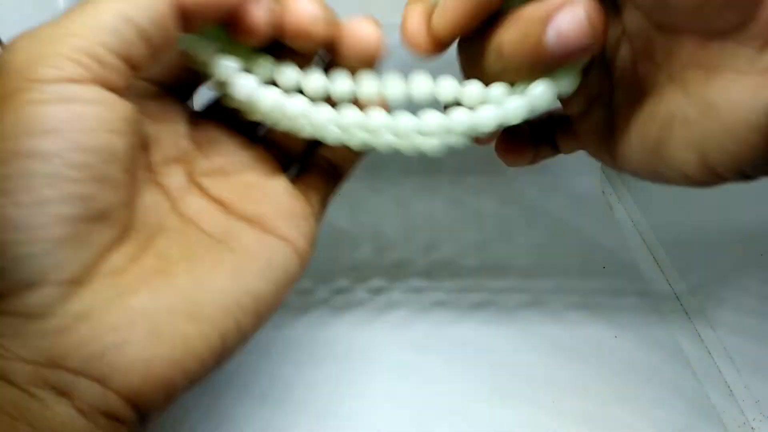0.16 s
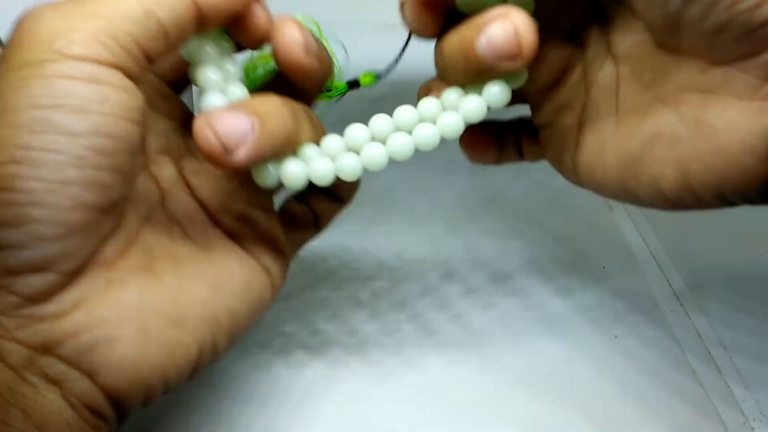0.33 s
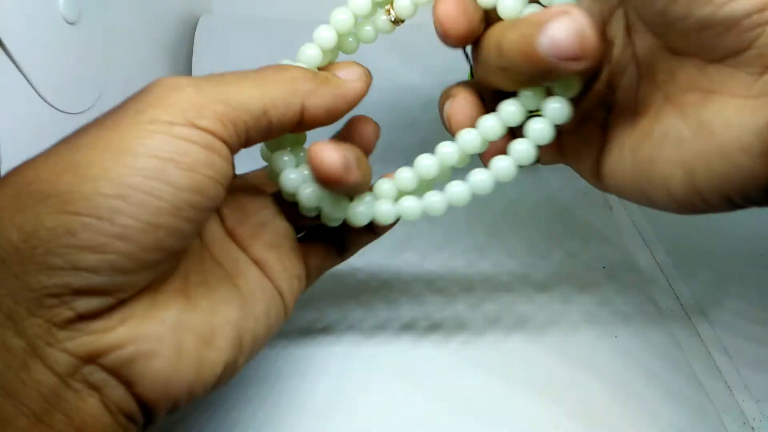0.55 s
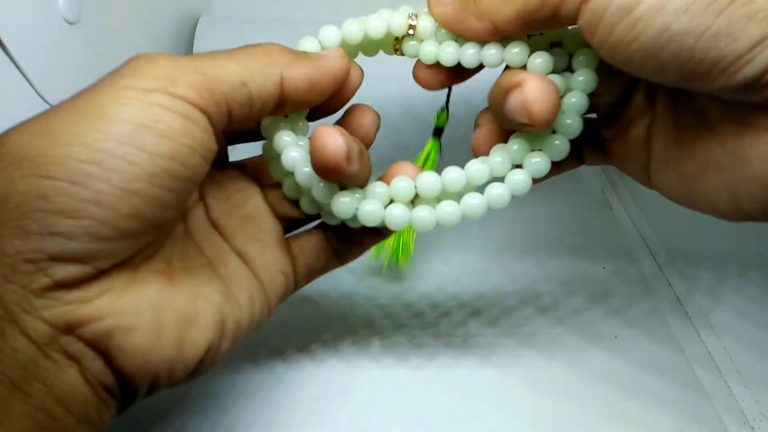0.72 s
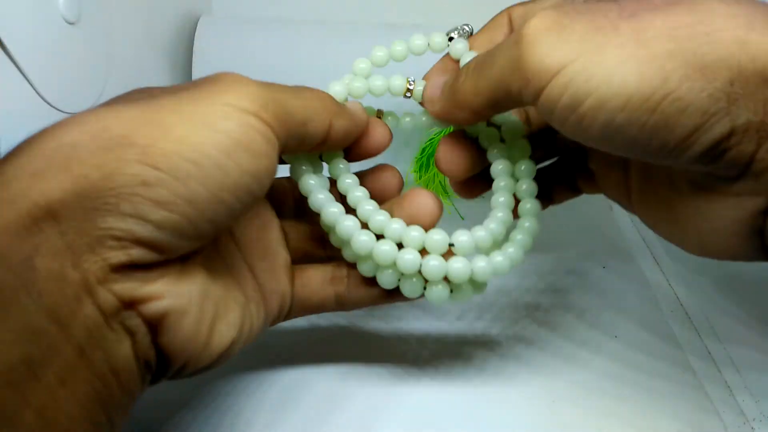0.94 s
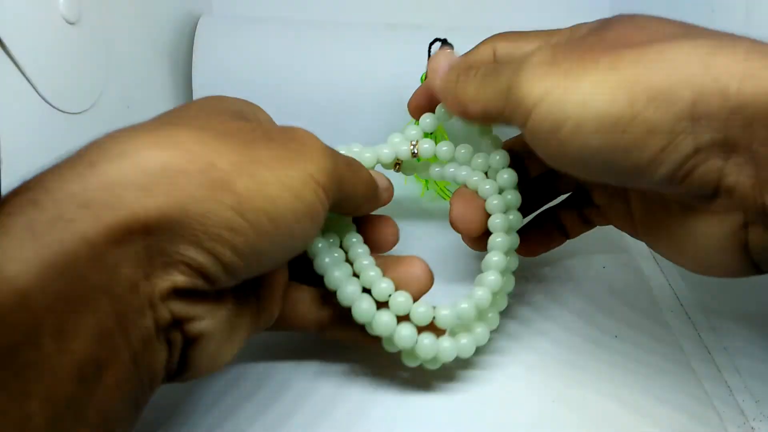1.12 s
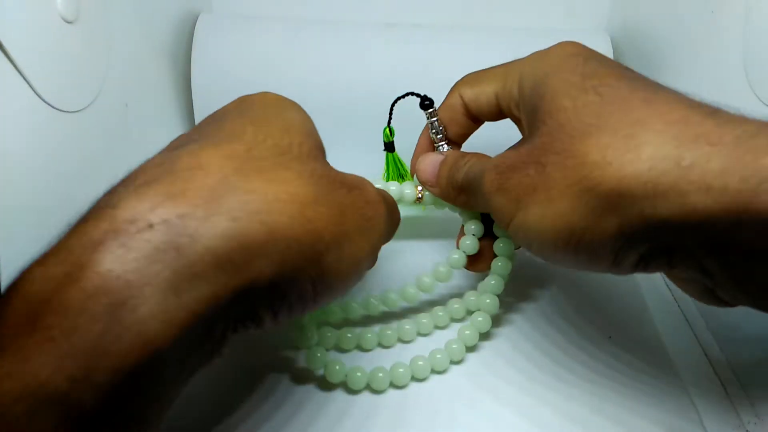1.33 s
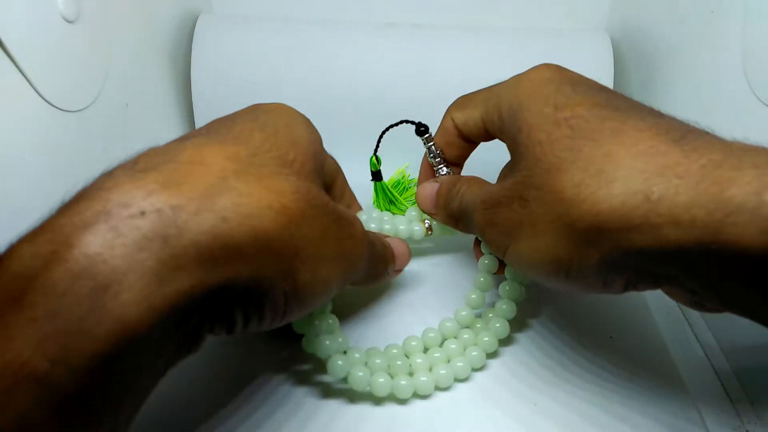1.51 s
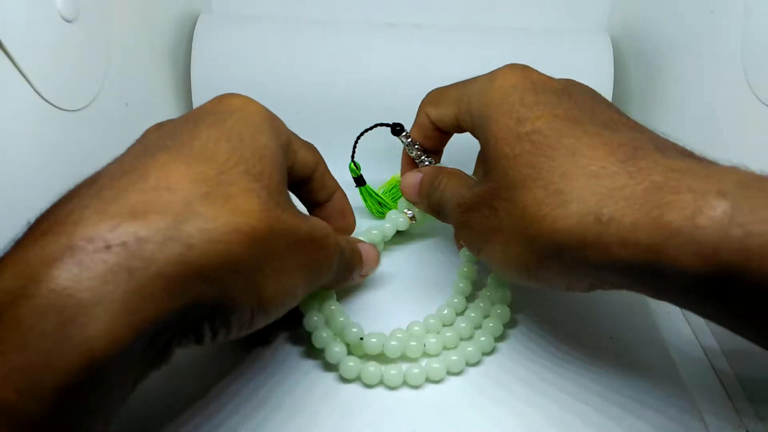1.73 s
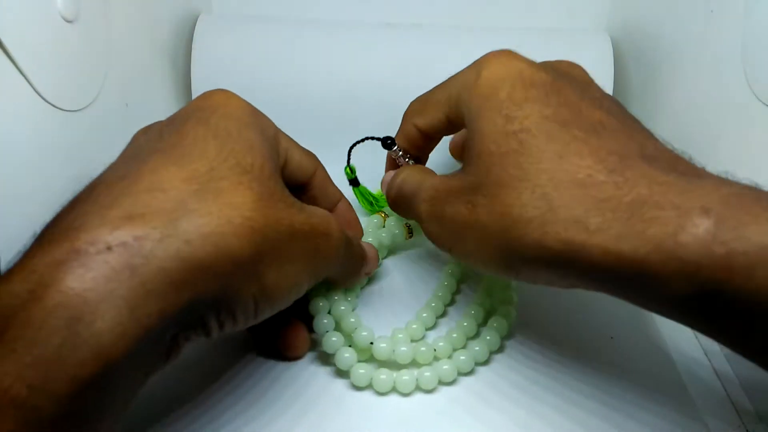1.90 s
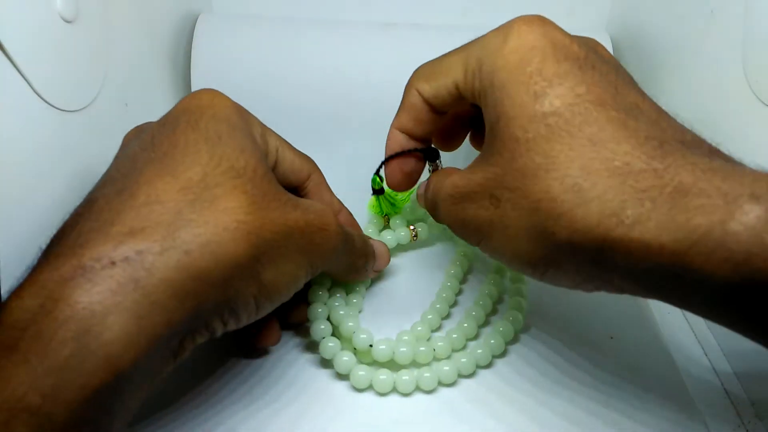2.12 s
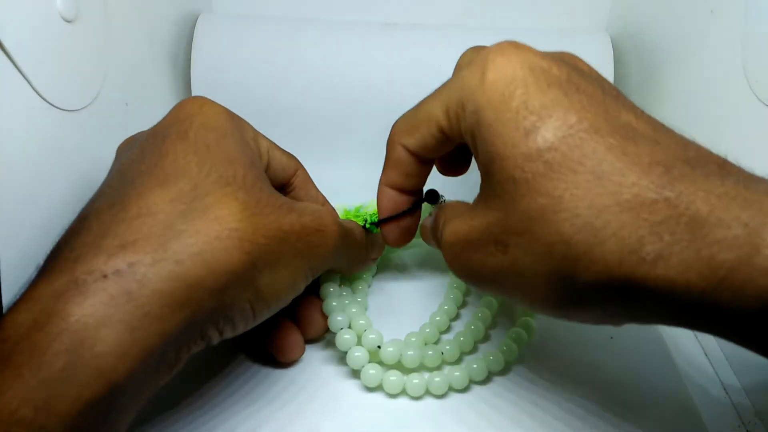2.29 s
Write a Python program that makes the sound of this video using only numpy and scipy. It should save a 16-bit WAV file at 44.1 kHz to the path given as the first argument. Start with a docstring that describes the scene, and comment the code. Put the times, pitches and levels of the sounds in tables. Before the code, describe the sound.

A string of small hard beads clicks and rattles in hands, then lands with dull thumps

```python
"""In a small quiet room, hands turn a string of small hard beads close to a phone, then lay it on
a light hollow table. Each knock runs along the string as a flurry of decaying noise cracks with
pings, over a finer rattle of random clicks. Noise forces on resonant modes make the table's dull
thumps and slide; short resonances make the taps, and low sines and rumble make its sway."""
import sys
import numpy as np
from scipy import signal
from scipy.fft import rfft, irfft
from scipy.io import wavfile
from scipy.ndimage import uniform_filter1d

SR = 44100
rng = np.random.default_rng(int(sys.argv[2]) if len(sys.argv) > 2 else 0)


def to_wav(s):
    """Save 16-bit WAV."""
    ch = np.atleast_2d(s).T  # columns
    pcm = np.round(np.clip(ch, -1, 1) * 32767)  # PCM
    wavfile.write(sys.argv[1], SR, pcm.astype(np.int16))


N = 103635


def undb(db):
    """Logarithmic level: dB to amplitude gain."""
    return 10 ** (np.asarray(db) / 20)


def unit(x):
    """Normalisation: scale to rms 1."""
    return x / np.sqrt(np.mean(x ** 2))


def peak(x, db):
    """Normalisation: scale to a given peak level in dB."""
    return x * undb(db) / np.max(np.abs(x))


def curve(table, order=1):
    """Linear interpolation: one column of a time table at every sample."""
    points = np.array(table)
    return np.interp(np.arange(N) / SR, points[:, 0], points[:, order])


def burst(start, length):
    """Transient envelope: a swell with quick rise and slower fall, cresting near 0.56."""
    u = np.clip((np.arange(N) / SR - start) / max(length, 1e-3), 0, 1)
    return 1.53 * np.sqrt(u) * (1 - u) ** 1.14


def ring(force, hz, t60):
    """Damped resonance: a two-pole mode driven by a force."""
    radius = np.exp(-np.log(1000) / (max(t60, 5e-4) * SR))
    angle = 2 * np.pi * hz / SR
    return signal.lfilter([np.sin(angle)], [1, -2 * radius * np.cos(angle), radius * radius], force)


def shade(x, points):
    """Spectral weighting: filter x by gains interpolated on a logarithmic frequency axis."""
    colour = np.array(points)
    hz = np.arange(N // 2 + 1) * SR / N + 1
    gain_db = np.interp(np.log(hz), np.log(colour[:, 0]), colour[:, 1])
    return irfft(rfft(x) * undb(gain_db), N)


def spikes(times, sizes):
    """Impulsive force: single-sample impacts of given sizes at given times."""
    return np.bincount(np.clip((times * SR).astype(int), 0, N - 1), sizes, N)


def patter(per_s, scatter_db):
    """Poisson process: random impact times, with sizes that are equal at zero scatter."""
    draws = rng.random((2500, 2))
    times = np.cumsum(-np.log(draws[:, 0] + 1e-9)) / per_s
    keep = times < N / SR
    # with scatter, most impacts are small and a few large
    return times[keep], undb(-scatter_db * np.log(draws[keep, 1] + 0.03))


# relative colour of the room noise: (frequency [Hz], gain [dB])
ROOM_COLOUR = [(25, -7), (55, -5.5), (110, -10.5), (220, -15.5), (310, -5), (450, -13), (700, -10),
               (960, -3.5), (1120, -14.5), (1500, -13), (2400, -23), (4000, -30.5), (15000, -38)]
ROOM_DB = -70.5
MURMUR_HZ, MURMUR_DB, MURMUR_S = 852, -77, 0.06


def room():
    """Stationary coloured noise, plus narrow-band noise that slow random modulation makes come and go."""
    sway = unit(uniform_filter1d(rng.standard_normal(N), int(MURMUR_S * SR)))
    murmur = ring(rng.standard_normal(N), MURMUR_HZ, 0.0049)
    murmur = unit(ring(murmur, MURMUR_HZ, 0.0049)) * sway
    hush = unit(shade(rng.standard_normal(N), ROOM_COLOUR))
    return hush * undb(ROOM_DB) + murmur * undb(MURMUR_DB)


# relative colour of a bead click: (frequency [Hz], gain [dB])
BEAD_COLOUR = [(1060, -54.5), (1800, -32.5), (2710, -28.5), (4320, -25.5), (5100, -22), (6610, -14.5),
               (7530, -12), (9030, -1.5), (10100, -4.5), (11300, -10), (14300, -12.5)]
CLICK_T60_S, CLICK_RISE_S = .002, .0002
ECHO_DB, ECHO_T60_S = -17, .04
PING_HZ, PING_SPREAD, PING_SHARE, PING_T60_S = 9910, 0.15, 0.43, .004
THIN, THIN_SPREAD = .85, .35  # share of the previous sample subtracted


def clicks(times, sizes, size=800):
    """Hard impact: a decaying noise crack, a ping of its own pitch, faint reflections; middle and side."""
    t = np.arange(size) / SR
    rise = 1 - np.exp(-t / CLICK_RISE_S)
    head = rise * undb(-60 * t / CLICK_T60_S)
    tail = rise * undb(ECHO_DB - 60 * t / ECHO_T60_S)
    ping_decay = rise * undb(-60 * t / PING_T60_S)
    at = np.clip((times[:, None] * SR).astype(int) + np.arange(size), 0, N - 1).ravel()
    out = []
    for _ in range(2):
        noise = rng.standard_normal((2500, size))[:len(times)]
        ping_hz = PING_HZ * (1 + PING_SPREAD * noise[:, :1])
        ping = PING_SHARE * np.sin(2 * np.pi * ping_hz * t)
        crack = noise * head + ping * ping_decay
        # body varies randomly from click to click
        thin = np.clip(THIN + THIN_SPREAD * noise[:, 1:2], 0, 1)
        grain = crack - thin * np.roll(crack, 1, axis=1) + noise * tail
        energy = np.sum(grain ** 2, axis=1)
        grain = grain * (sizes / np.sqrt(energy))[:, None]
        out.append(shade(np.bincount(at, grain.ravel(), N), BEAD_COLOUR))
    return np.array(out)


# fine rattle while the fingers move: (time [s], level [dB])
# the level scales clicks whose whole-scene rms, middle and side together, is 1
RATTLE_LEVEL = [(0, -37.5), (.04, -56), (.1, -57.5), (.175, -75), (.2, -57), (.29, -39), (.33, -41),
                (.36, -55.5), (.395, -56.5), (.42, -55), (.51, -53.5), (.565, -77.5), (.65, -57.5),
                (.7, -50), (.73, -52.5), (.82, -65), (.86, -44), (.92, -50.5), (.945, -62.5), (1.0, -49.5),
                (1.06, -52.5), (1.1, -71.5), (1.19, -49), (1.285, -74), (1.31, -42), (1.4, -52),
                (1.47, -51), (1.57, -54), (1.63, -55.5), (1.7, -39.5), (1.75, -56), (1.82, -60.5),
                (1.88, -45.5), (1.95, -50), (2.0, -79.5), (2.075, -73.5), (2.1, -56), (2.155, -74),
                (2.19, -67), (2.22, -88), (2.35, -92.5)]
RATTLE_PER_S, RATTLE_SCATTER_DB = 610, 0


def rattle():
    """Random superposition: dense clicks of equal energy before colouring, under a moving level."""
    times, sizes = patter(RATTLE_PER_S, RATTLE_SCATTER_DB)
    return unit(clicks(times, sizes)) * undb(curve(RATTLE_LEVEL))


# knocks of bead on bead: (time [s], level before KNOCK_DB and click colour [dB])
KNOCK_EVENTS = [(0.0492, -33), (0.0684, -34.5), (0.087, -30.5), (0.124, -40.5), (0.168, -45.5),
                (0.1889, -35), (0.1923, -33), (0.2043, -25.5), (0.2232, -24), (0.2437, -25.5),
                (0.2587, -32), (0.261, -21.5), (0.2642, -22), (0.2663, -14.5), (0.287, -28.5),
                (0.3019, -24.5), (0.3104, -20), (0.3184, -31), (0.4018, -28.5), (0.411, -35),
                (0.437, -29.5), (0.465, -36.5), (0.484, -39), (0.5016, -33.5), (0.531, -44), (0.6044, -42),
                (0.644, -42.5), (0.6824, -31.5), (0.6934, -32), (0.7355, -33), (0.7692, -31.5),
                (0.7955, -39), (0.8297, -31), (0.8921, -34), (0.952, -32), (0.963, -45), (0.9674, -33.5),
                (0.9798, -33), (0.986, -32), (0.993, -42), (1.0017, -26.5), (1.0155, -35.5),
                (1.1247, -36.5), (1.151, -34), (1.1655, -31), (1.1863, -31), (1.2163, -33), (1.2415, -42.5),
                (1.2637, -41.5), (1.296, -34.5), (1.3065, -26.5), (1.3249, -25.5), (1.333, -31),
                (1.3385, -32), (1.371, -38.5), (1.4229, -35.5), (1.462, -24.5), (1.4993, -25),
                (1.5423, -27.5), (1.5554, -25.5), (1.5658, -33), (1.584, -27.5), (1.6635, -29.5),
                (1.6688, -28.5), (1.6867, -29), (1.6997, -16.5), (1.857, -36), (1.86, -19), (1.909, -37.5),
                (2.0884, -35), (2.1673, -48.5), (2.186, -47), (2.3429, -65.5)]
KNOCK_DB, FLURRY_S = 23.5, 0.0027  # gain of the bare click; time scale of the followers
FOLLOW_DB, FOLLOW_SCATTER_DB = -13, 3


def knocks(count=6):
    """Impact chain: a main click, then mostly weaker ones from its neighbours on the string."""
    t, db = np.array(KNOCK_EVENTS).T[:, :, None]
    draws = rng.standard_normal((len(KNOCK_EVENTS), count, 2))
    follows = np.arange(count) > 0
    late = (np.abs(draws[..., 0]) + 0.3) * follows
    follow_db = FOLLOW_DB + FOLLOW_SCATTER_DB * draws[..., 1]
    level_db = db + KNOCK_DB + follows * follow_db
    times = t - 2 * CLICK_RISE_S + late * FLURRY_S  # starts early to allow for the rise
    return clicks(times.ravel(), undb(level_db).ravel())


# low bumps of hands and table:
# (time [s], level before the swell and bass cut [dB], pitch [Hz], length [s])
BUMP_EVENTS = [(0.087, -60.5, 86.7, 0.12), (0.525, -57.5, 59.4, 0.078), (0.583, -63.5, 63, 0.11),
               (1.331, -57.5, 58.4, 0.036), (1.68, -56, 60, 0.084), (1.755, -49, 64.2, 0.14),
               (1.84, -61, 62.6, 0.15), (1.937, -62, 71.4, 0.16), (1.95, -44.5, 136, 0.039),
               (2.02, -53.5, 66, 0.059), (2.065, -52, 58, 0.1), (2.142, -54.5, 58.4, 0.097)]
BUMP_ROUGH = .8  # rms of the rumble beside a sway of rms 1


def bumps():
    """Low-frequency oscillation: each bump is a few cycles of a sway, shaken by resonant rumble."""
    t = np.arange(N) / SR
    rumble = ring(ring(rng.standard_normal(N), 56, 0.03), 82, 0.01)
    rumble = BUMP_ROUGH * unit(rumble)
    total = np.zeros(N)
    for at, db, hz, length in BUMP_EVENTS:
        sway = np.sqrt(2) * np.sin(2 * np.pi * hz * (t - at))
        total += undb(db) * burst(at, length) * (sway + rumble)
    return total


# modes of the table: (frequency [Hz], share before hardness [dB], main resonator t60 [s])
TABLE_MODES = [(143, -5.5, 0.11), (290, 3.5, 0.082), (440, 4.5, 0.097), (751, -10.5, 0.064),
               (909.5, -8.5, 0.07), (1401, -4, 0.023), (1820, -12.5, 0.045), (2412, -16, 0.011),
               (2880, -16, 0.0027), (4150, -18, 0.00079)]


def table(force, hardness_db):
    """Modal superposition: modes at set shares; hardness tilts them per octave above 300 Hz."""
    total = np.zeros(N)
    for hz, db, t60 in TABLE_MODES:
        mode = unit(ring(ring(force, hz, t60 / 4), hz, t60))
        tilt_db = hardness_db * max(np.log2(hz / 300), 0)
        total += undb(db + tilt_db) * mode
    return total


# beads sliding on the table: (time [s], level applied to unit-rms scraping [dB])
SLIDE_LEVEL = [(1.28, -72), (1.35, -50), (1.42, -65.5), (1.55, -60), (1.63, -67.5), (1.75, -63),
               (1.87, -58.5), (1.935, -63.5), (1.947, -65), (2.0, -72.5), (2.2, -87.5)]
SLIDE_PER_S, SLIDE_SCATTER_DB = 1000, 1.5
SLIDE_HARDNESS_DB = 6.5  # per octave


def slide():
    """Friction as random micro-impacts: small scrapes excite the table modes."""
    times, sizes = patter(SLIDE_PER_S, SLIDE_SCATTER_DB)
    start = SLIDE_LEVEL[0][0]
    gate = curve([(start, 0), (start + .03, 1)])
    scrape = unit(table(spikes(times, sizes), SLIDE_HARDNESS_DB))
    return scrape * undb(curve(SLIDE_LEVEL)) * gate


# loops of the string landing on the table:
# (time [s], peak level [dB], length [s], hardness [dB per octave])
THUMP_EVENTS = [(1.297, -42.5, 0.039, 1), (1.317, -47, .035, 10.5), (1.452, -40.5, 0.019, -0.5),
                (1.49, -37, 0.016, -3.5), (1.672, -47.5, 0.017, 2.5), (1.69, -30.5, 0.015, 3.5),
                (1.698, -44.5, 0.064, 1), (1.951, -36.5, 0.019, 1.5)]
PALM_S, PALM_SHARE = 0.0024, 0.43  # length and share of the soft push


def thumps():
    """Forced modal response: a brief soft push and the rough landing of many beads shake the table."""
    total = np.zeros(N)
    for t, db, length, hardness_db in THUMP_EVENTS:
        rough = uniform_filter1d(rng.standard_normal(N), size=5)
        force = rough * burst(t, length) + PALM_SHARE * burst(t, PALM_S)
        total += peak(table(force, hardness_db), db)
    return total


# single beads tapping the table: (time [s], peak level [dB], pitch [Hz], length of force [s])
TAP_EVENTS = [(1.334, -44, 1340, .012), (1.352, -38, 1400, 0.012), (1.496, -53, 2420, 0.0077),
              (1.501, -46.5, 3750, 0.0073), (1.542, -49, 1540, 0.0056), (1.543, -38, 2080, 0.0036),
              (1.783, -39.5, 1470, 0.0057), (1.788, -49.5, 1730, 0.038), (1.893, -51, 2414, 0.034),
              (1.897, -51.5, 1390, 0.03), (1.919, -41, 2145, 0.03)]
TAP_T60_S = .011


def taps():
    """Noise-driven resonance: each tap rings roughly at its own pitch; the longer ones scrape."""
    total = np.zeros(N)
    for t, db, hz, length in TAP_EVENTS:
        force = rng.standard_normal(N) * burst(t, length)
        total += peak(ring(force, hz, TAP_T60_S), db)
    return total


WIDE_HZ, WIDE_DB = 6500, -8.5


def scene():
    """Mid-side stereo: all sources sit in the middle; only the clicks' treble differs left and right."""
    mid, side = knocks() + rattle()
    mid = mid + thumps() + taps() + slide() + bumps() + room()
    treble = signal.butter(4, WIDE_HZ, "high", fs=SR, output="sos")
    side = signal.sosfilt(treble, side) * undb(WIDE_DB)
    return np.array([mid + side, mid - side])


BASS_HZ = 54.6
EDGE_HZ, EDGE_DB, TOP_HZ = 14250, -38, 15569


def record(dry):
    """Band limiting: the phone drops the deepest bass; its treble steps down near the top, then ends."""
    bass_cut = signal.butter(4, BASS_HZ, "high", fs=SR, output="sos")
    edge = signal.ellip(8, .2, 40, EDGE_HZ, fs=SR, output="sos")
    top = signal.ellip(8, .2, 70, TOP_HZ, fs=SR, output="sos")
    x = signal.sosfilt(bass_cut, dry)
    low = signal.sosfiltfilt(edge, x)
    stepped = low + undb(EDGE_DB) * (x - low)
    return signal.sosfilt(top, stepped)


dry = scene()
out = record(dry)
to_wav(out)
```